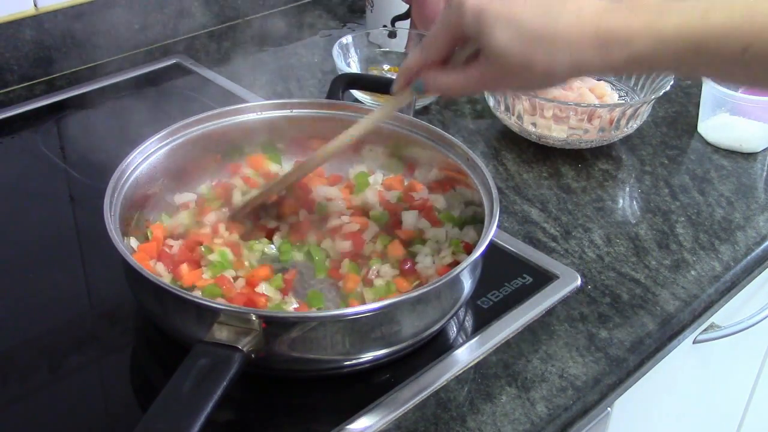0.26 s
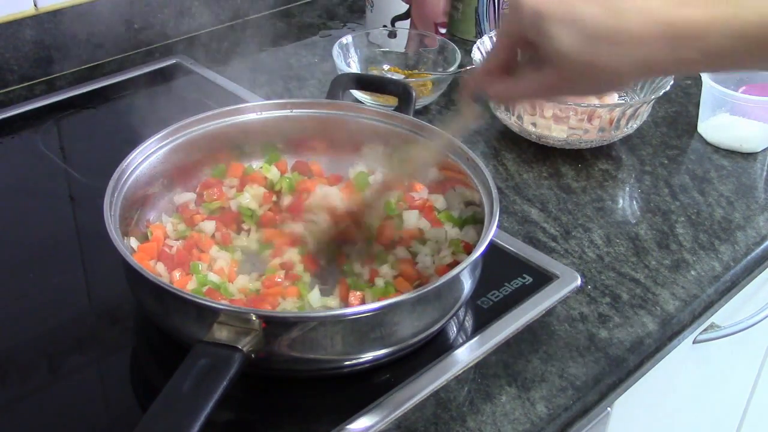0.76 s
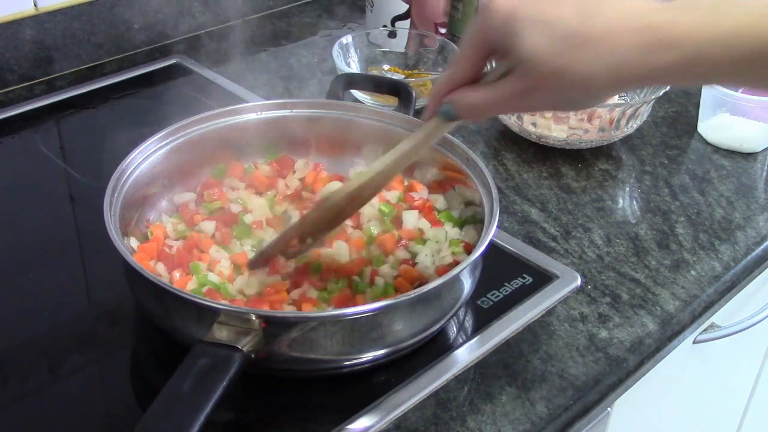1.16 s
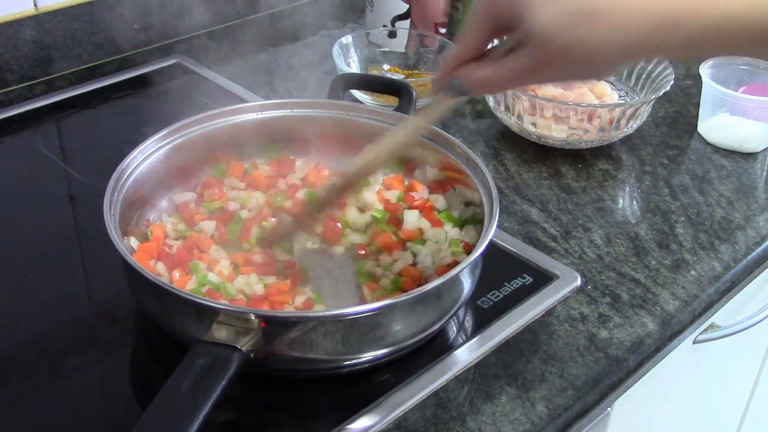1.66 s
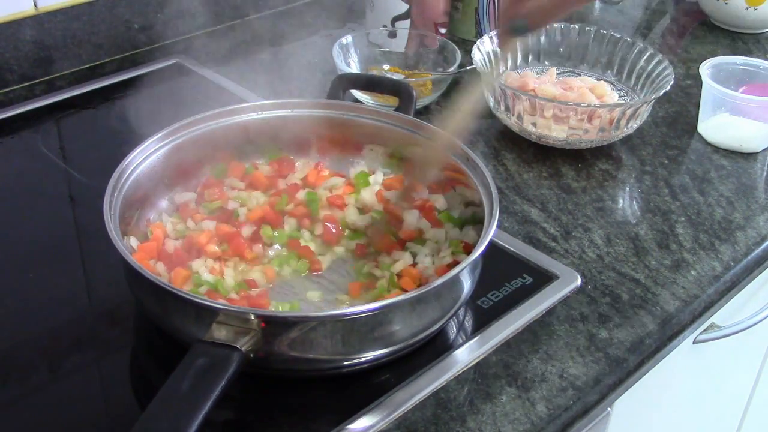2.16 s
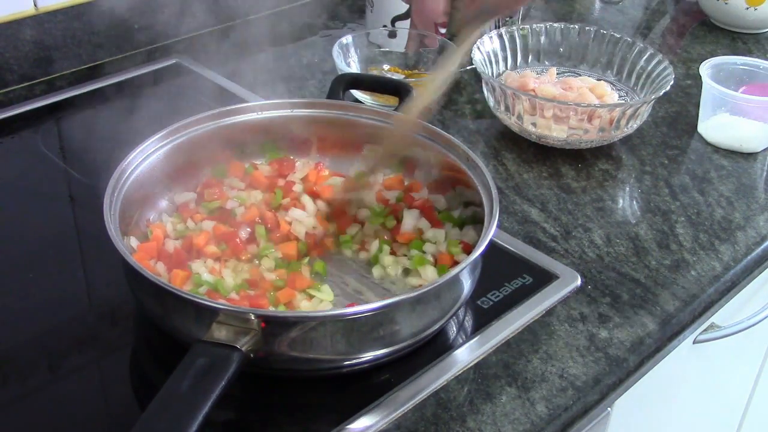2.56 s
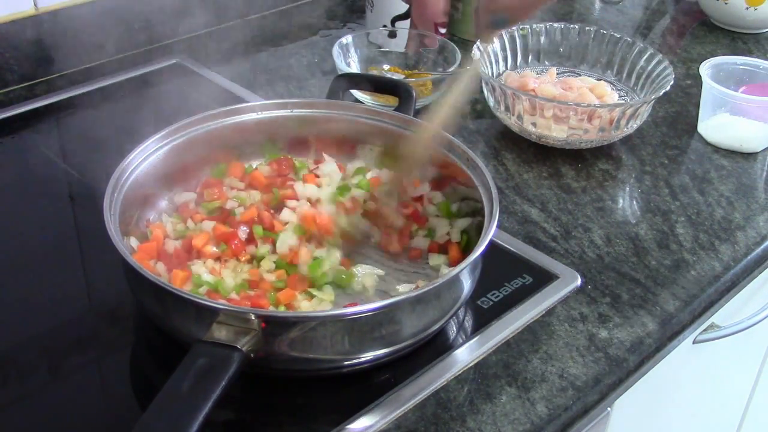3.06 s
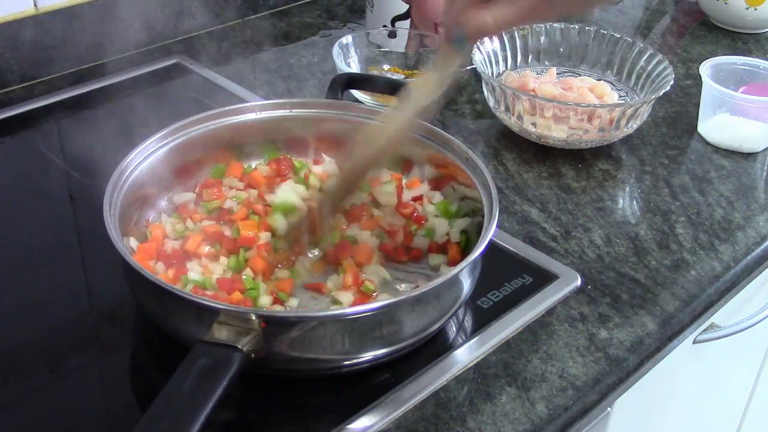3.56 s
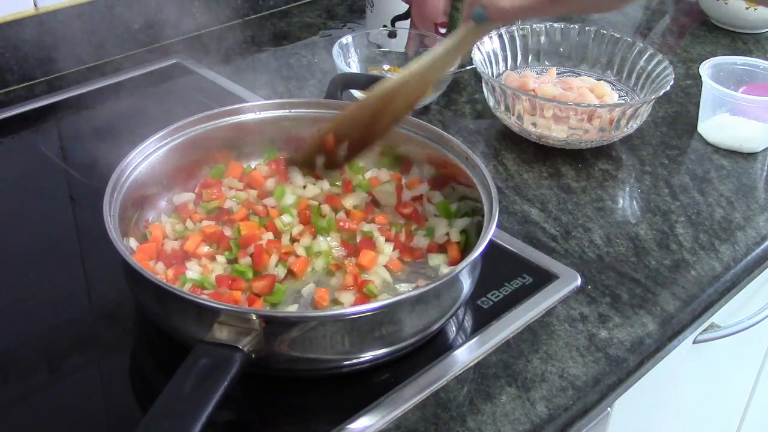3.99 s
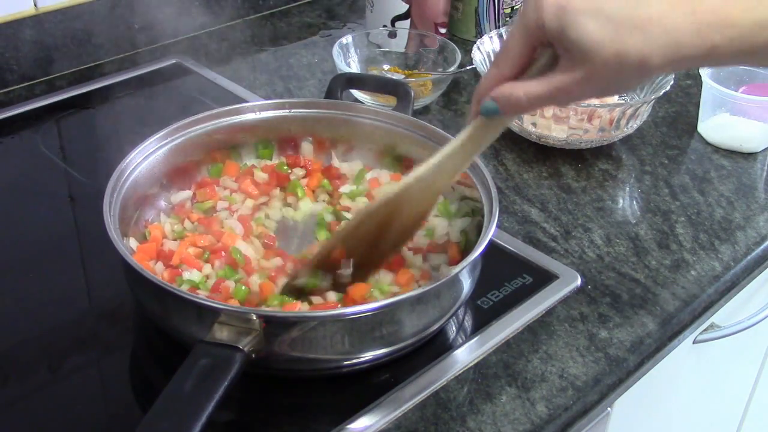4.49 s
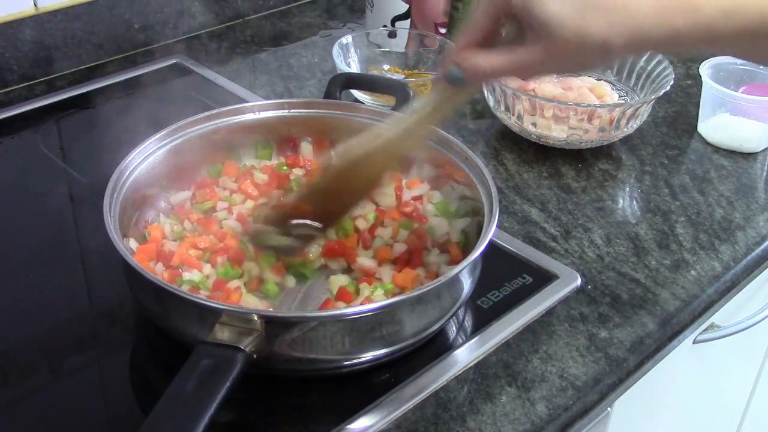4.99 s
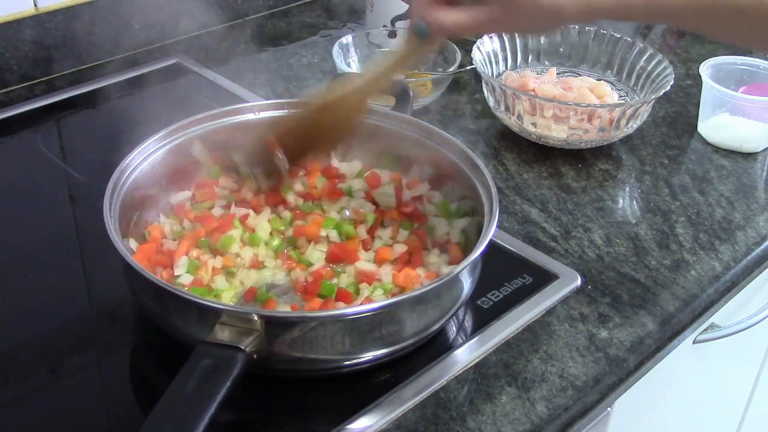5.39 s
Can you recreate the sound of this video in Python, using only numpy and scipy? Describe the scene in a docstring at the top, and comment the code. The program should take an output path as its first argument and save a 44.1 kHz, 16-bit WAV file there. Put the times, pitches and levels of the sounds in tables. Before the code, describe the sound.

A dense, steady hiss of vegetables frying in hot oil, flaring slightly as a wooden spatula stirs and taps the pan.

```python
"""A dense, bright sizzle: diced vegetables fry in a steel pan while a wooden spatula stirs them.
Countless steam bubbles burst in the hot oil and blend into a hiss; larger ones add a lower roar,
and the sizzle flares as strokes turn wet food onto the steel. The pan's modes hum with the boiling,
sing under the dragging spatula and ring at its knocks. Beneath lie a faint kitchen rumble and a few
dull thumps. One close microphone feeds both channels."""
import sys
import numpy as np
from scipy import signal
from scipy.fft import rfft, irfft
from scipy.io import wavfile
from scipy.ndimage import uniform_filter1d, minimum_filter1d

SR = 44100
rng = np.random.default_rng(int(sys.argv[2]) if len(sys.argv) > 2 else 0)


def master_out(mix):
    """Clip the mix to full scale and print it as 16-bit PCM to the path in sys.argv[1]."""
    frames = np.transpose(np.atleast_2d(mix))
    ceiling = np.clip(frames, -1, 1)
    pcm = np.round(ceiling * 32767).astype(np.int16)
    wavfile.write(sys.argv[1], SR, pcm)


N = 248724

# sizzle between strokes: (time [s], hiss level [dB], roar level [dB], hum level [dB])
SIZZLE_LEVELS = [(0.0, -14.5, -16.5, -27), (1.0, -15, -19, -27), (1.9, -16, -19.5, -29),
                 (3.5, -16.5, -19, -28), (4.4, -15.5, -18.5, -27), (5.64, -14.5, -17.5, -27)]
# strokes turning wet food: (start [s], length [s], hiss flare [dB], roar flare [dB], hum flare [dB])
STROKE_FLARES = [(0.037, 0.23, 0.5, 0, 0.5), (.57, .1, 3, 3.1, 0.5), (0.727, 0.22, 1.2, 1.8, 0),
                 (1.245, 0.23, 1, 1.3, 2.5), (2.204, 0.14, 1, 2.3, 1), (2.5, 0.33, 0.5, 1.2, 1.5),
                 (3.236, 0.054, -0.2, 0.2, 4.5), (3.635, .14, 2.1, 0.52, 0.5), (3.962, 0.24, 2, 2.6, 3),
                 (4.38, 0.15, 2.5, 1.3, 2.5), (4.686, 0.15, 1, 1.5, 2), (5.02, 0.12, 0, 0.41, 2),
                 (5.414, .1, -0.7, 2, 1)]
# spectrum of the tiny bubbles, before the treble tilt: (frequency [Hz], relative density [dB])
HISS_SPECTRUM = [(1500, -42), (3000, -10), (4300, -5.5), (5400, -4), (6900, 2), (8000, 0.4), (9000, -1.5),
                 (10300, -1), (12000, -5.5), (14000, -9.5), (16000, -13.5)]
# spectrum of the larger bubbles: (frequency [Hz], relative density [dB])
ROAR_SPECTRUM = [(300, -71), (680, -35), (760, -13.5), (1100, -4), (1500, -4), (2200, -1.5), (3300, -0.9),
                 (4200, -4), (6000, -9), (9000, -45)]
# pan modes: (frequency [Hz], decay time t60 [s], weight in hum [dB], weight in knock or scrape [dB])
PAN_MODES = [(267, .17, -27, -4), (324, .16, -23, -5), (392, .11, -19, -5), (445, .17, -11.5, -12),
             (522, .12, -11, -1), (590, .1, -17, -3), (640, .1, -17, -4), (727, .1, -7, -7),
             (785, .09, -7, -12), (850, .09, -8.5, -9), (924, .14, -6, -14), (975, .11, -2, -7),
             (1090, .06, -6, -12), (1245, .05, 1.5, -9), (1330, .05, -4, -9), (1740, .04, -7, -14),
             (2000, .05, -9, -12), (2240, .05, -9, -8), (2890, .06, -12, -5), (3150, .05, -10, -5),
             (1160, .17, -7, -1.5), (2557, .2, -14, -7), (2676, .15, -8, -3)]
# spatula blows and their drive to four groups of modes:
# (time [s], near 300 Hz [dB], near 550 Hz [dB], near 1200 Hz [dB], near 2700 Hz [dB])
SPATULA_KNOCKS = [(0.199, -57, -45, -34, -17), (0.681, -54, -40, -23, -24), (2.165, -34, -21.5, -15, -35),
                  (2.602, -34, -18.5, -13.5, -33), (2.808, -55, -39, -15.5, -18),
                  (3.052, -27, -17.5, -20, -7.5), (3.134, -44, -30, -34, -35),
                  (4.753, -25.5, -26, -26, -31), (4.998, -37, -28.5, -26, -18)]
# spatula edge dragging over bare steel: (start [s], length [s], level [dB])
SPATULA_SCRAPES = [(.06, .17, -25), (.62, .09, -26), (.79, .2, -26), (1.27, .12, -26), (2.8, .06, -30),
                   (3.67, .05, -28), (4.02, .1, -27), (4.2, .09, -31), (4.33, .08, -31), (4.43, .08, -32),
                   (4.54, .09, -26), (5.44, .08, -25)]
# brief, dull low thumps: (time [s], peak level [dB])
LOW_THUMPS = [(0.223, -59), (0.554, -42), (4.746, -52)]
# spectrum of the kitchen rumble: (frequency [Hz], relative density [dB])
RUMBLE_SPECTRUM = [(20, -9), (65, -8), (100, -1), (200, -2), (260, 0.7), (400, -25)]


def bubble_hiss():
    """Superposition: tiny steam bubbles burst so densely that they blend; larger spits poke out."""
    pops = crackle(click_share=0.63, per_s=2500, spread_db=-1)
    hiss = patchy(coloured(pops, HISS_SPECTRUM), patch_db=0.74, flicker_db=0.4, tilt_db_per_oct=-2.24)
    return sizzle_envelope(layer=0) * hiss


def bubble_roar():
    """Resonance falls with size: larger bubbles make a lower roar."""
    pops = crackle(click_share=0.36, per_s=900, spread_db=1)
    roar = patchy(coloured(pops, ROAR_SPECTRUM), patch_db=0.9, flicker_db=0.3)
    return sizzle_envelope(layer=1) * roar


def pan_hum():
    """Forced vibration: boiling shakes each mode at its own spots, so the modal powers add."""
    freqs = np.fft.rfftfreq(N, 1 / SR)
    power = 0
    for hz, t60, db, _ in PAN_MODES:
        width_hz = np.log(1000) / (np.pi * t60)
        detuning = 0.89 * (freqs - hz) / width_hz
        power += gain_of(db) ** 2 * t60 / (1 + detuning ** 2) ** 2  # steep skirts
    hum = irfft(rfft(rng.standard_normal(N)) * np.sqrt(power), N)
    # moving food damps the steel unevenly, so the hum wavers
    frames = signal.stft(hum, nperseg=2048, noverlap=1536)[2]
    waver_db = 2.6 * smooth_field(frames.shape, bins=4, frames=14)
    hum = signal.istft(frames * gain_of(waver_db), nperseg=2048, noverlap=1536)[1][:N]
    return sizzle_envelope(layer=2) * patchy(hum, patch_db=0.42, flicker_db=0.24)


def spatula_knocks():
    """Impact excitation: a blow rings every mode; where it lands sets the share of low and high."""
    out, t = np.zeros(N + SR), np.arange(8000) / SR
    group_edges_hz, swell_cycles = [400, 440, 750, 850, 1800, 2000], 0.35
    draws = rng.random((len(SPATULA_KNOCKS), len(PAN_MODES) + 400))
    for (start, *group_db), draw in zip(SPATULA_KNOCKS, draws):
        edge_db = np.repeat(group_db, 2)[1:-1]
        knock = np.zeros(len(t))
        for (hz, t60, _, db), chance in zip(PAN_MODES, draw):
            drive_db = np.interp(hz, group_edges_hz, edge_db) - 2.1 * (1 - chance)
            swell = (1 - np.exp(-t * hz / swell_cycles)) ** 2
            knock += gain_of(db + drive_db) * swell * damped_mode(hz, t60)
        noise = draw[-400:] - 0.5
        steel_crack = transient(noise, band_hz=[2000, 3600], decay_s=0.004)
        wood_tock = transient(noise[::-1], band_hz=[500, 1500], decay_s=0.0025)
        knock[:400] += gain_of(group_db[3] + 22) * steel_crack + gain_of(group_db[1] + 33) * wood_tock
        out[round(start * SR):][:len(t)] += knock
    return out[:N]


def spatula_scrapes():
    """Stick-slip friction: wood slipping on steel drives the upper modes, most those that ring long."""
    pressure = np.zeros(N)
    for start, length, db in SPATULA_SCRAPES:
        drag = signal.windows.tukey(round(length * SR), 0.4)
        pressure[round(start * SR):][:len(drag)] += gain_of(db) * drag
    response = sum(t60 * gain_of(db) * damped_mode(hz, t60) for hz, t60, _, db in PAN_MODES if hz > 2500)
    slips = crackle(click_share=0.73, per_s=300, spread_db=3)
    return signal.oaconvolve(slips * pressure, response / np.linalg.norm(response))[:N]


def wall_reflections(direct, t60=0.32, delay_s=0.008, level_db=-9):
    """Reverberation: hard kitchen walls return a sound as a short, dense tail."""
    t = np.arange(SR // 3) / SR
    tail = rng.standard_normal(len(t)) * gain_of(-60 * t / t60) * (t > delay_s)
    return gain_of(level_db) * signal.oaconvolve(direct, tail / np.linalg.norm(tail))[:N]


def low_thumps(rise_s=0.0014):
    """Pulse bandwidth: one rounded pulse holds mostly bass, so each is heard as a brief, dull thump."""
    out, age = np.zeros(N + SR), np.arange(2000) / SR / rise_s
    for start, db in LOW_THUMPS:
        out[round(start * SR):][:len(age)] += gain_of(db) * age * np.exp(1 - age)
    return out[:N]


def kitchen_rumble(level_db=-60, drift_db=3.3):
    """Ambient noise: a low rumble whose level drifts at random."""
    rumble = coloured(rng.standard_normal(N), RUMBLE_SPECTRUM)
    drift = unit_rms(uniform_filter1d(rng.standard_normal(N), size=5000))
    return gain_of(level_db + drift_db * drift) * rumble


def sizzle_envelope(layer, rise_s=0.054, settle_s=0.094):
    """Evaporation: wet food on hot steel flares a layer (0 hiss, 1 roar, 2 hum), which then settles."""
    t = np.arange(N) / SR
    times, *levels = np.transpose(SIZZLE_LEVELS)
    level_db = np.interp(t, times, levels[layer])
    for start, length, *flare_db in STROKE_FLARES:
        rise = (t - start) / rise_s
        settle = 1 + (start + length - t) / settle_s
        level_db += flare_db[layer] * np.clip(np.minimum(rise, settle), 0, 1)
    return gain_of(level_db)


def crackle(click_share, per_s, spread_db):
    """Shot noise: random clicks of uneven size stand on a bed of white noise."""
    bed = rng.standard_normal(N)
    sizes = gain_of(spread_db * np.minimum(rng.exponential(1, N), 3))
    clicks = sizes * rng.standard_normal(N) * (rng.random(N) < per_s / SR)
    return unit_rms(bed + click_share * unit_rms(clicks))


def patchy(x, patch_db, flicker_db, tilt_db_per_oct=0):
    """Random modulation: each spot boils on its own, so bands swell and fade and the whole flickers."""
    hz, times, frames = signal.stft(x, SR, nperseg=256, noverlap=192)
    patches = smooth_field(frames.shape, bins=9, frames=28)
    flicker = unit_rms(uniform_filter1d(rng.standard_normal(len(times)), size=22))
    treble_octaves = np.log2(np.maximum(hz, 6000) / 6000)[:, None]
    frames *= gain_of(patch_db * patches + flicker_db * flicker + tilt_db_per_oct * treble_octaves)
    return unit_rms(signal.istft(frames, SR, nperseg=256, noverlap=192)[1][:N])


def damped_mode(hz, t60):
    """Free vibration: one mode of the steel falls by 60 dB in t60 seconds."""
    t = np.arange(8000) / SR
    return gain_of(-60 * t / t60) * np.sin(2 * np.pi * hz * t)


def transient(noise, band_hz, decay_s):
    """Modal overlap: many fast-dying modes merge into a brief band of noise."""
    band = signal.lfilter(*signal.butter(2, band_hz, "bandpass", fs=SR), noise)
    return band * np.exp(-np.arange(len(noise)) / SR / decay_s)


def coloured(x, spectrum):
    """Spectral shaping: filters by a curve drawn on a log-frequency axis, at unit rms."""
    hz, db = np.transpose(spectrum)
    freqs = np.fft.rfftfreq(N, 1 / SR)
    shape_db = np.interp(np.log(freqs + 1), np.log(hz), db)
    return unit_rms(irfft(rfft(x) * gain_of(shape_db), N))


def smooth_field(shape, bins, frames):
    """Correlated noise: random values averaged over neighbouring frequencies and times."""
    across_pitch = uniform_filter1d(rng.standard_normal(shape), size=bins, axis=0)
    return unit_rms(uniform_filter1d(across_pitch, size=frames, axis=1))


def gain_of(db):
    """Decibel law: a level as an amplitude factor."""
    return 10 ** (np.asarray(db) / 20)


def unit_rms(x):
    """Normalisation: scales to an rms of 1."""
    return x / np.sqrt(np.mean(x ** 2) + 1e-20)


def scene():
    """Filtering: the microphone's steep low cut removes the bass from the sizzle, knocks and scrapes."""
    sizzle = bubble_hiss() + bubble_roar() + pan_hum()
    scrapes, knocks = spatula_scrapes(), spatula_knocks()
    low_cut = signal.butter(8, 240, "highpass", fs=SR, output="sos")
    pan = signal.sosfilt(low_cut, sizzle + scrapes + knocks + wall_reflections(knocks))
    return np.tile(pan + low_thumps() + kitchen_rumble(), (2, 1))


def record(dry, ceiling=0.95, cutoff_hz=15620):
    """Peak and band limiting: the gain dips briefly at peaks over the ceiling; a low-pass follows."""
    safe_gain = np.minimum(ceiling / (np.abs(dry) + 1e-9), 1)
    gain = minimum_filter1d(safe_gain, size=241, axis=1)
    for _ in range(2):
        gain = uniform_filter1d(gain, size=121, axis=1)
    low_pass = signal.firwin(1023, cutoff_hz, window=("kaiser", 9), fs=SR)
    return signal.oaconvolve(dry * gain, low_pass[None], "same")


dry = scene()
out = record(dry)
master_out(out)
```